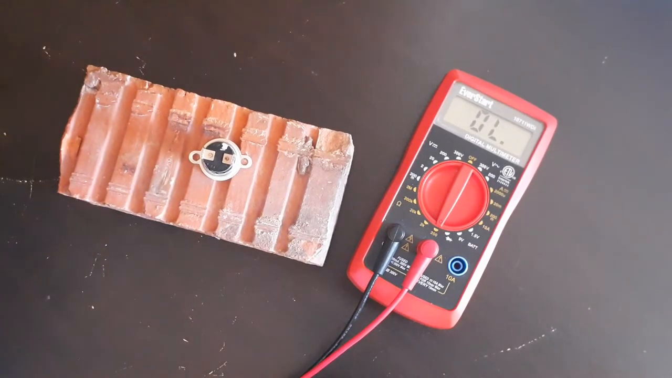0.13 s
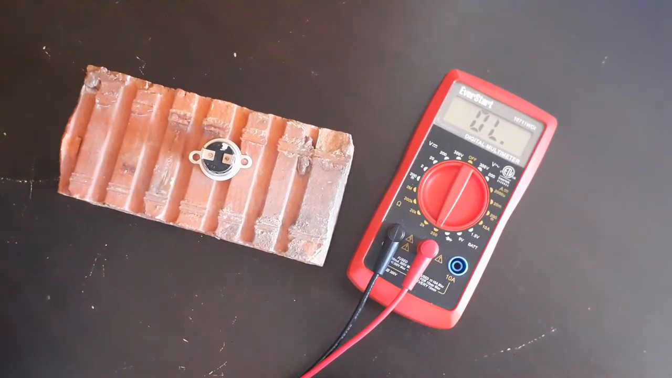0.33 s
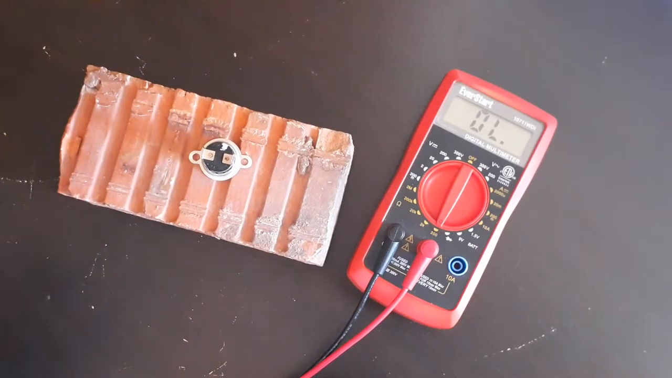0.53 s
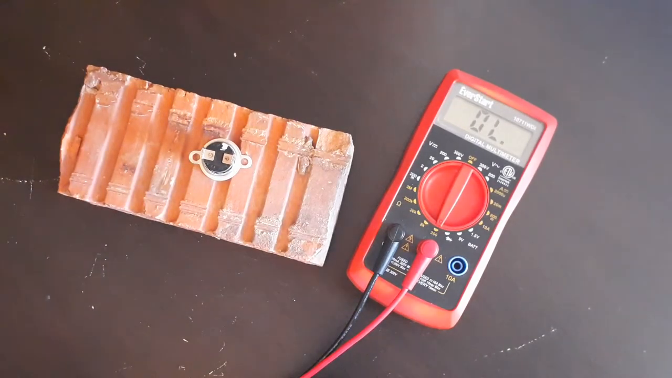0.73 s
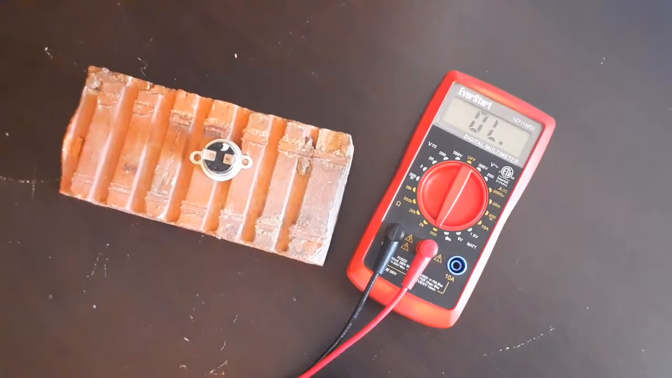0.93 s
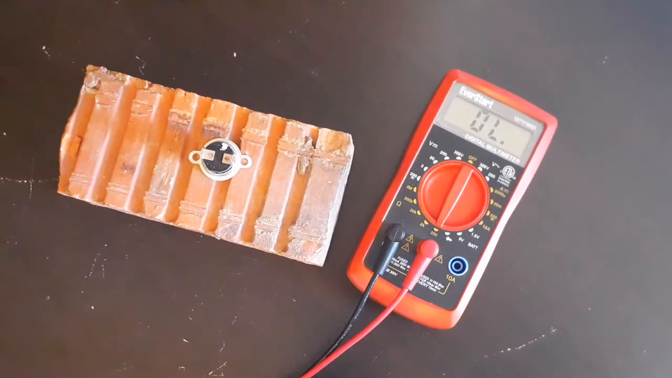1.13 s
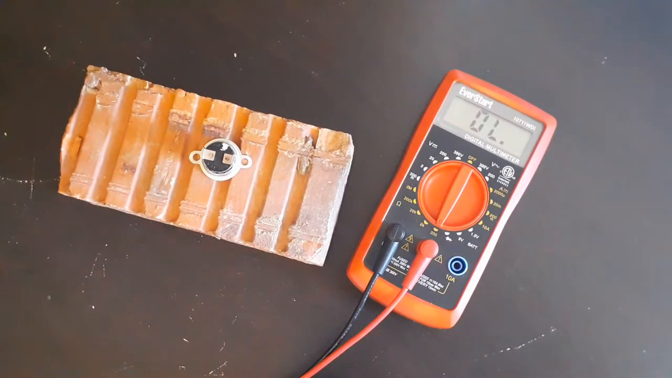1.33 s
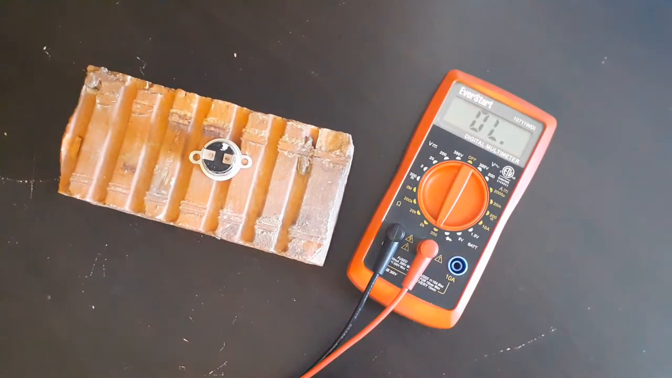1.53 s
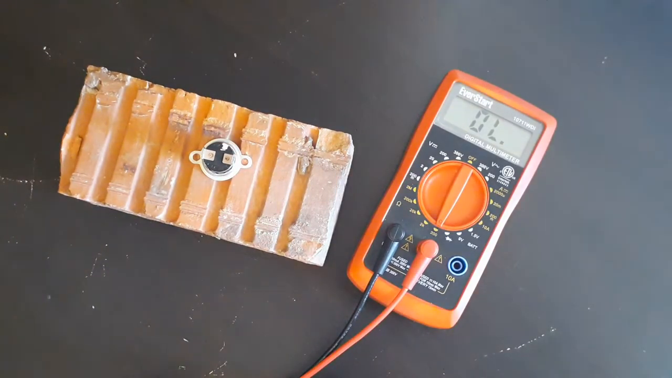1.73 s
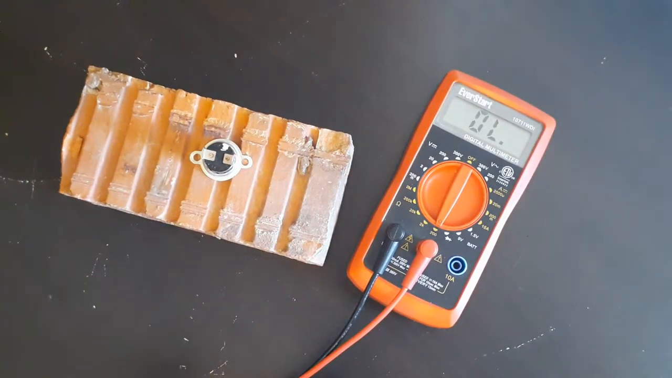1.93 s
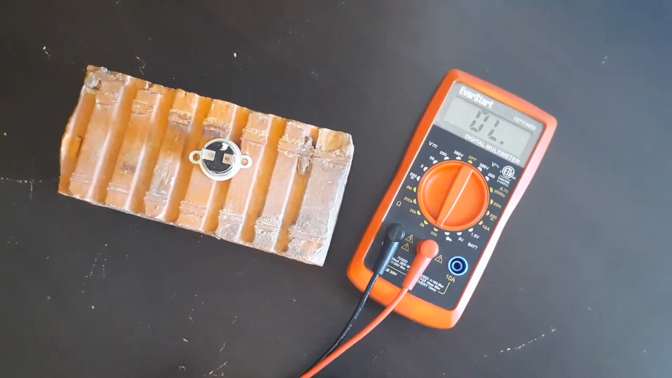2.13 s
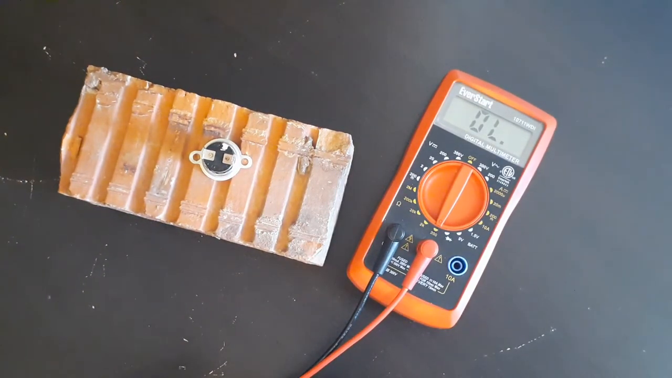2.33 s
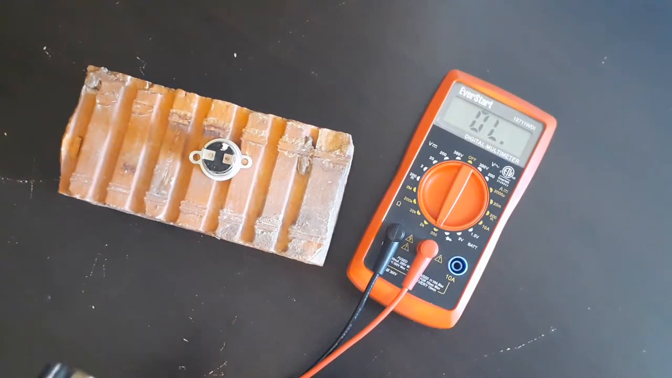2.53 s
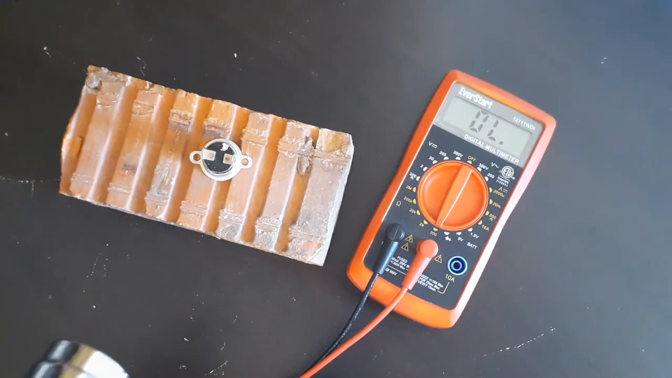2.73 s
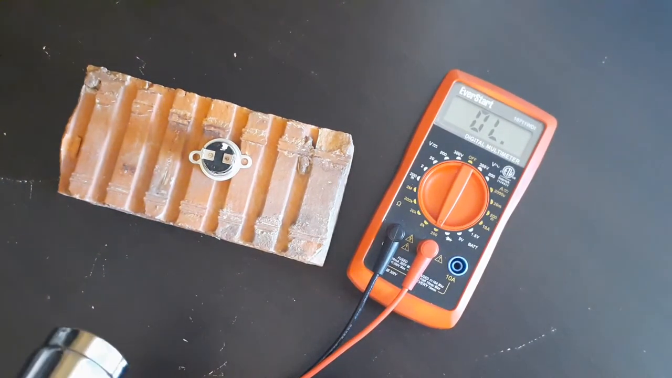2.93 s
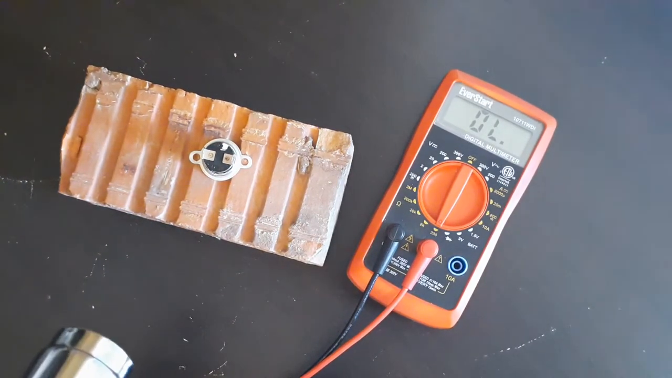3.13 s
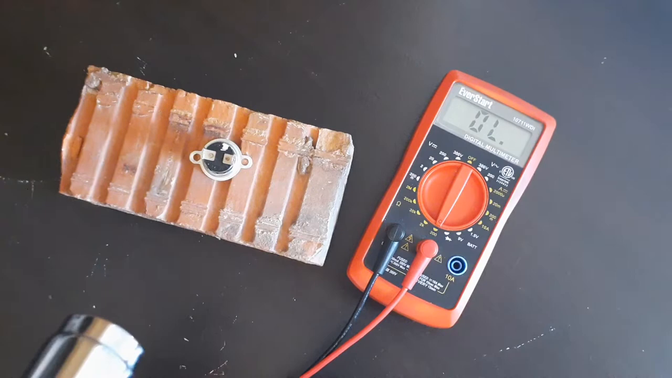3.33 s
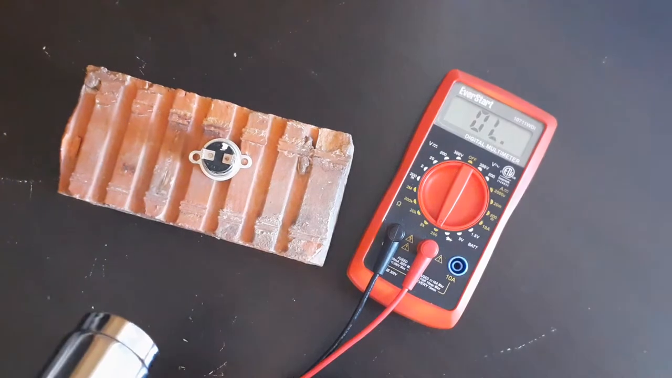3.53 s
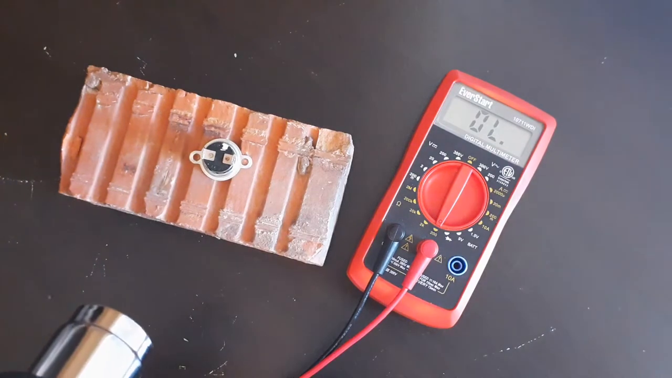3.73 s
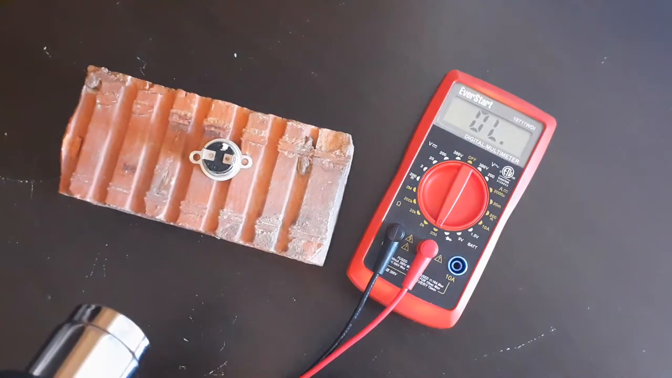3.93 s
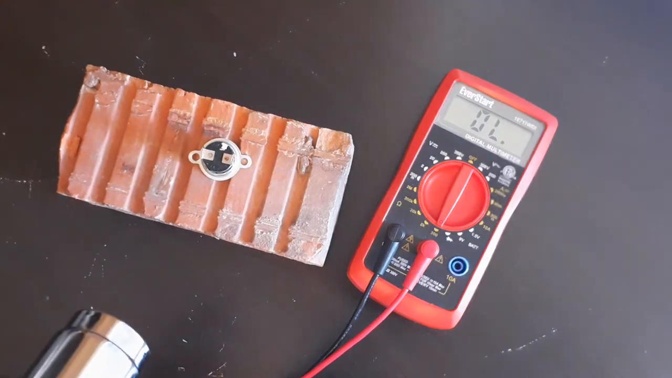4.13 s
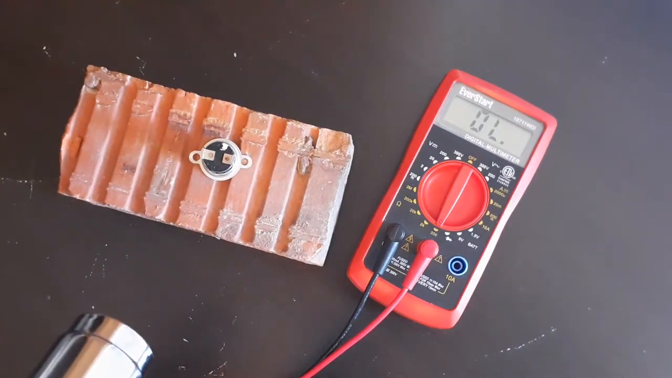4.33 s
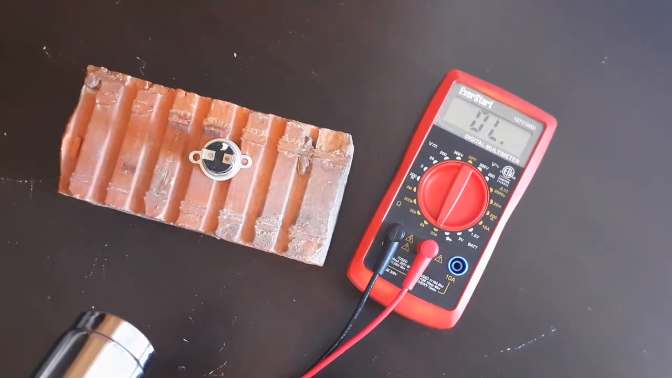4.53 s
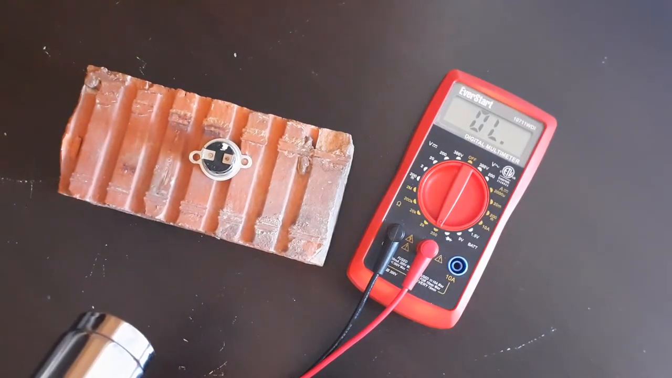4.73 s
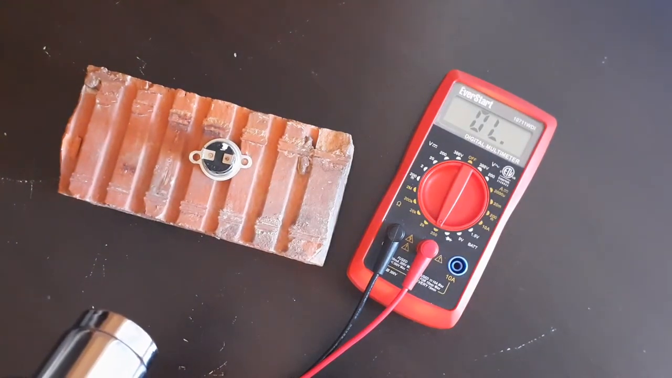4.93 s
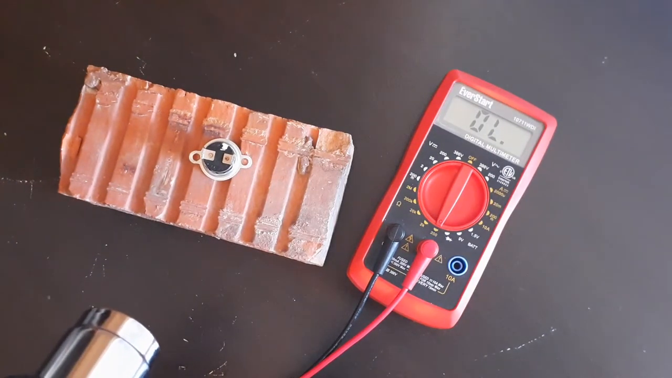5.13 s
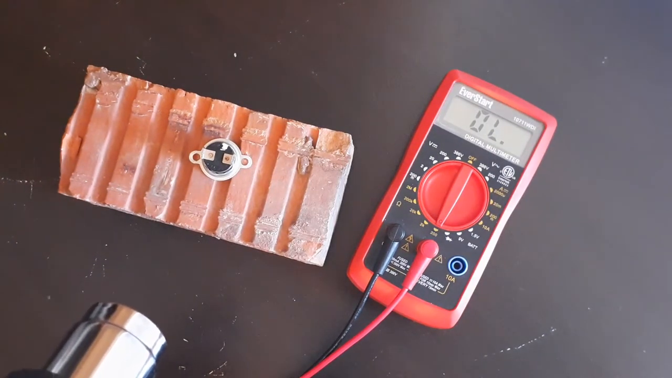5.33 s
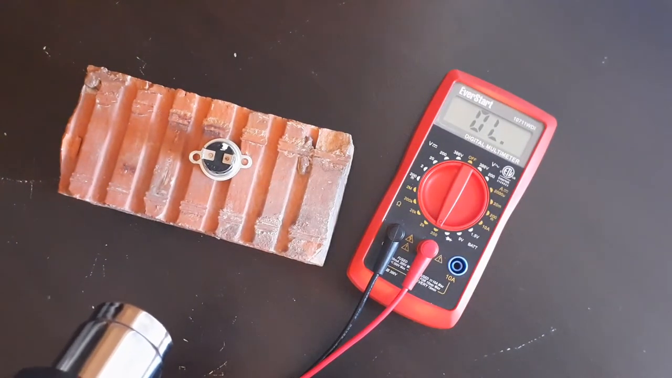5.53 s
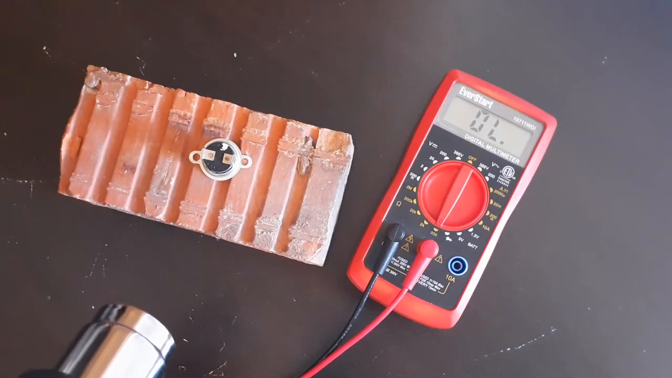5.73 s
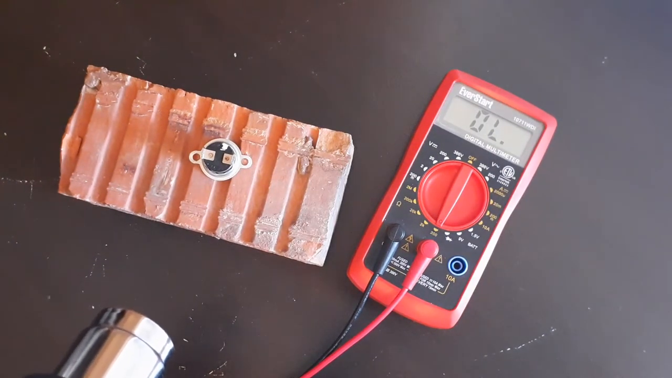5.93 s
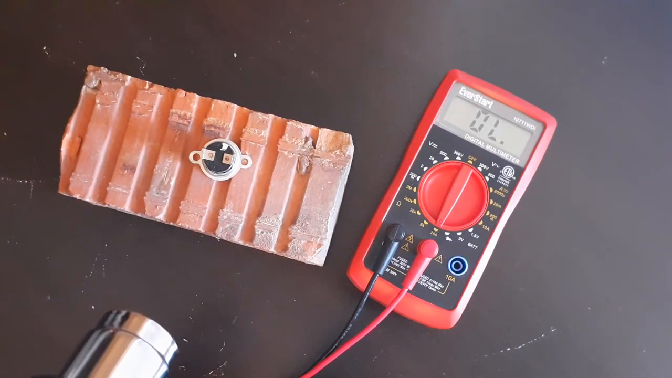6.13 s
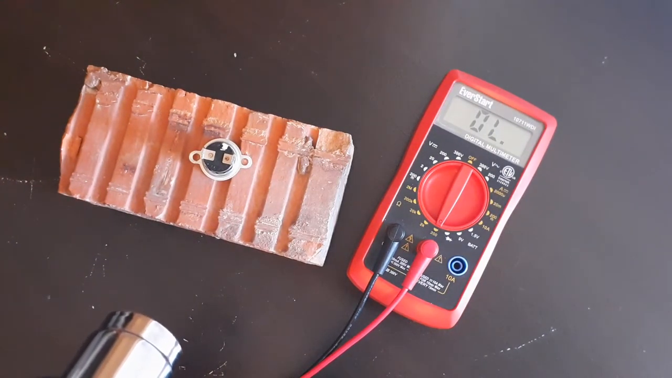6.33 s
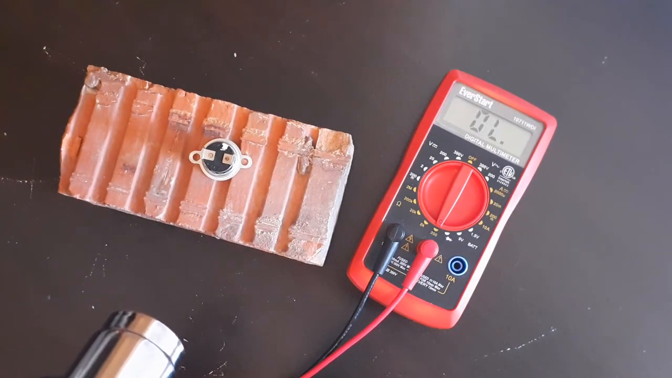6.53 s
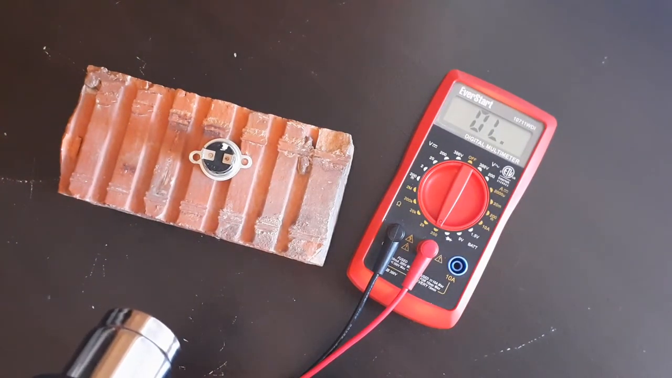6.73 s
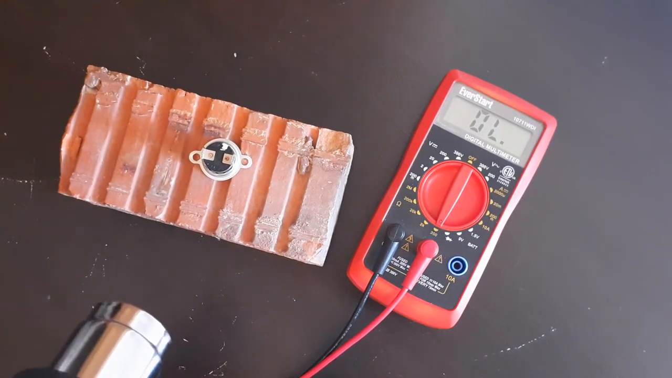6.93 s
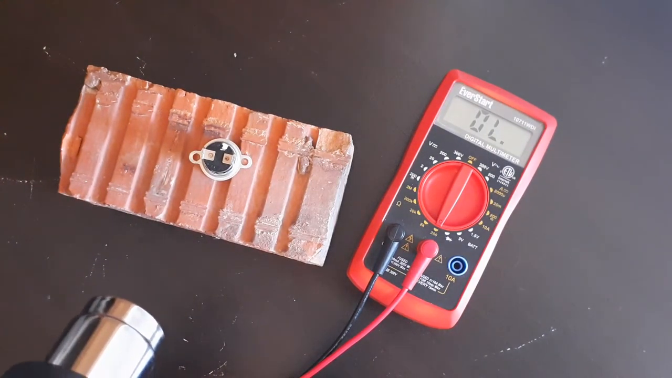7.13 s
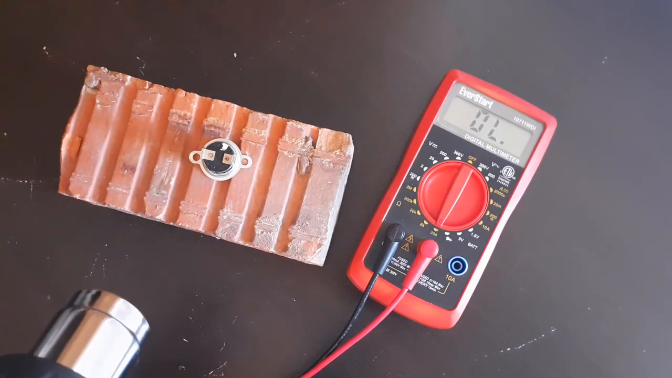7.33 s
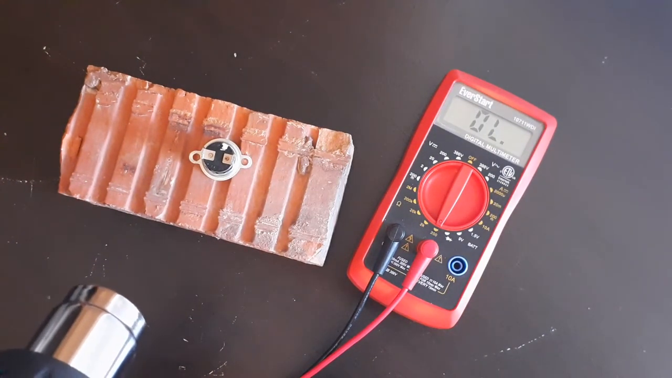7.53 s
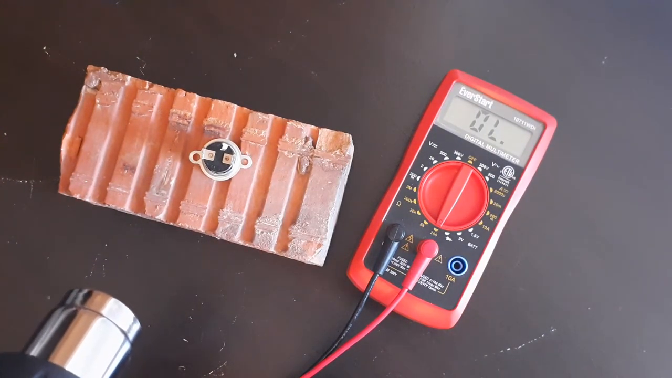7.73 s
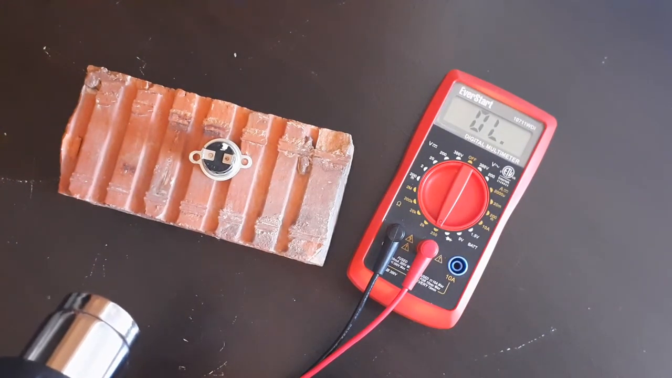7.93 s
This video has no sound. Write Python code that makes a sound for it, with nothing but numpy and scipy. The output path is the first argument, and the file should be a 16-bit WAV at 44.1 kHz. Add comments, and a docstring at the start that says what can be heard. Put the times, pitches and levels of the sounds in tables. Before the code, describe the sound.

A heat gun is dragged across a table close to the microphones in a small, quiet room, with a low scrape, a tiny squeak and a soft knock in the first half second. Its cord slides over the tabletop with a grainy rustle and a few light ticks until about 1.2 seconds. The plastic switch clicks sharply twice, at about 1.3 and 1.6 seconds, and the motor starts. A fan whine climbs in pitch while a hollow rush of air grows louder and brighter, with a few more soft scrapes and knocks on the table until about 2.4 seconds. By around 4 seconds the gun is near full speed and the pitch gradually levels off. It keeps blowing steadily to the end at about 8 seconds, the high whine gently swelling and fading over the air, a faint low hum and a thin motor buzz.

```python
"""A heat gun starts up

In a small room a heat gun is dragged off a table, its cord slides after it, and its switch clicks twice.
The motor speeds up: air rushes through the barrel, a twelve-blade fan whines, the rotor hums and the
brushes buzz. The whine swells and fades as the gun is held near the microphones in an unsteady hand."""
import sys
import numpy as np
from scipy import signal
from scipy.fft import rfft, irfft
from scipy.io import wavfile

SR = 44100
rng = np.random.default_rng(int(sys.argv[2]) if len(sys.argv) > 2 else 0)


def transcribe(signal):
    """Save signal, clipped to [-1, 1], as a 16-bit WAV file at the path in sys.argv[1]."""
    frames = np.atleast_2d(signal).T
    limited = np.clip(frames, -1, 1)
    pcm = np.round(limited * 32767).astype(np.int16)
    wavfile.write(sys.argv[1], SR, pcm)


N = 356636
TIME = np.arange(N) / SR
BINS = np.maximum(np.arange(N // 2 + 1) * SR / N, 1)  # the frequencies of a spectrum, in Hz

MOTOR_ON_S, FULL_TURNS_PER_S = 1.5456, 237.91
# The quick and the slow part of speeding up: share_of_full_speed, time_constant_s
SPEED_UP = [(.2338, .4813), (.7662, 1.0958)]
def heat_gun():
    """One motor drives air, fan and brushes. Its speed climbs from 0 (still) toward 1 (full)."""
    age = np.maximum(TIME - MOTOR_ON_S, 0)
    speed = sum(share * (1 - np.exp(-age / lag_s)) for share, lag_s in SPEED_UP)
    speed = speed * (1 + 0.000294 * drift(4.34))
    angle = 2 * np.pi * np.cumsum(speed * FULL_TURNS_PER_S) / SR
    return air_rush(speed) + fan(angle, speed) + brushes(angle, speed)


# The tone of swirling air: frequency_hz, level_db
AIR_TONE = [(40, -44), (100, -16), (280, -14), (450, -6), (900, -5), (1600, -0.1), (2200, -3), (3000, -3.5),
            (4300, -9), (6500, -15), (10000, -18.4), (14500, -21), (15800, -26)]
# Where the barrel and housing ring: pitch_hz, width_hz, left_db, right_db
BARREL_RINGS = [(574, 76, 0.5, 6), (769.5, 41, 11.5, 12), (890, 164, 5, 6), (1034, 73, -0.5, 9.5),
                (1299, 170, 10, 0.5), (1492, 108, 5, 6), (1597, 38, 7, 6), (1770, 56, 5.5, 1.5),
                (1908, 48, 9, 4.5), (2053, 24, 8, 5.5), (2424, 96, 3.5, -1.5), (2607, 89, 5.5, 3.5),
                (2960, 280, 5, 9.5), (3260, 63, 3.5, 4.5), (3790, 580, 0.5, 5.5), (4300, 650, 3, 3.5),
                (4760, 150, 3.5, 4.5), (4945, 110, 6, 6.5), (5470, 140, -1.5, 9.5), (5940, 300.0, 6, -1.5),
                (6870, 220.0, 5.5, 8.5), (8340, 410, 2.5, 8), (8500, 520, 6.0, 0), (9280, 870, 7.5, 3.5),
                (11800, 1800, 3.5, 3), (14405.0, 225.0, 6, -3)]
# How slow air sounds hollow next to fast air: frequency_hz, gain_db
HOLLOW_TONE = [(150, 4), (300, -5), (480, 6), (800, 1), (1050, 5.5), (1400, 2.5), (1900, -1.5), (2250, 5),
               (2600, 1.5), (2950, -2), (3250, -4), (3600, 3), (3950, 6), (4450, -2), (5200, 3), (6200, 2),
               (6850, 1), (7600, 2), (10000, -8), (11800, -1), (13000, 1), (14400, 3)]
def air_rush(speed, level_db=-28, treble_hz=2270, hollow_below=0.45):
    """Air swirls through the barrel: hollow when slow, louder and brighter when fast."""
    barrel_db = np.array([bumps([(hz, width, sides_db[ear]) for hz, width, *sides_db in BARREL_RINGS])
                          for ear in range(2)])
    rush = stereo_noise(at_hz(AIR_TONE) + barrel_db, ripple_db=2.86)
    hollow = shape_tone(rush, at_hz(HOLLOW_TONE))
    rush = rush + (hollow - rush) * np.clip((1 - speed) / (1 - hollow_below), 0, 1)
    treble = irfft(rfft(rush) / (1 + (treble_hz / BINS) ** 4), N)
    rush = rush - treble + treble * speed ** 0.57
    return rush * speed ** 2.74 * from_db(level_db + 0.38 * drift(10.3))


# The whine swells and fades as its echoes add up or cancel: time_s, left_db, right_db, left_lead_rad
WHINE_SWELLS = [(1.9, -11, -9, 2.6), (2.03, -6, -8, 1.5), (2.2, -22, -14, 1.5), (2.31, -11, -4.5, 1.7),
                (2.38, -17, -20, 4.6), (2.5, -14, -2.5, 3.5), (2.58, -8, -5, 3.9), (2.66, -9, -6, 1.7),
                (2.78, -2.5, -7, 0.7), (2.87, -10, -15, .9), (2.96, -5, -6, 2.1), (3.08, -8, -11, 2.4),
                (3.18, -2, -12, 4.3), (3.26, 0, -1, 2.8), (3.33, -3.5, -10, 2.3), (3.39, -1.5, 0, 2.4),
                (3.45, -5, -3, 3.9), (3.54, -1, 2.5, 3.37), (3.64, 0.5, -7, 3.9), (3.7, 2, 0, 2.3),
                (3.78, -1, 3.5, 3.8), (3.87, 2, -2, 4.56), (3.97, 5.5, -10, 2.6), (4.1, 1, 3, 2.1),
                (4.18, -3, 2.5, 2.54), (4.36, 2.5, 3, 3.34), (4.72, -2.5, 1.5, 2.9), (4.8, -8, 2, 2.1),
                (4.94, -0.5, 5, 4), (5.2, -2.5, -1.5, 3.93), (5.46, 2.5, 3.5, 3.83), (5.6, -1, 1, 3.4),
                (5.7, -0.5, 4, 3.35), (5.82, -4, 4.5, 3.96), (6.88, -3, 0.5, 4.1), (6.96, -11, -2, 5.5),
                (7.24, -1.5, 0.5, 4.5), (8.08, -1.5, -1, 4.5)]
# Where the gun's body boosts the hum: pitch_hz, width_hz, gain_db
BODY_RINGS = [(178, 16, 9), (229.7, 14.4, 8.5)]
# Faint low tones of the fan: cycles_per_turn, level_db
UNEVEN_TONES = [(2, -54), (3, -63), (5, -52), (6, -56), (7, -57)]
def fan(angle, speed, blades=12, whine_db=-28.5, hum_db=-52):
    """Passing blades whine, the off-balance rotor hums, and uneven blades add low tones."""
    left_db, right_db, lead = in_time(WHINE_SWELLS)
    flutter = np.array([drift(23) + 1j * drift(40) for ear in range(2)])
    depth = 0.06 + 0.8 * np.clip(1 - speed, 0, 0.3)  # a rising tone wavers against its own echoes
    fade_in = 1 / (1 + np.exp((0.38 - speed) / 0.064))  # halfway in at 38% of full speed
    blade_tone = np.exp(1j * (blades * angle + lead * [[.5], [-.5]])) * (1 + depth * flutter)
    whine = from_db(whine_db + np.array([left_db, right_db])) * speed ** 1.1 * blade_tone.real
    body_db = bumps(BODY_RINGS, speed * FULL_TURNS_PER_S)
    hum = from_db(hum_db + body_db + [[-.7], [.7]]) * np.sin(angle + [[.25], [-.25]])
    uneven = sum(from_db(db + 3.1 * drift(7.7)) * np.sin(k * angle + rng.uniform(0, np.pi, (2, 1)))
                 for k, db in UNEVEN_TONES)
    return np.sqrt(2) * (fade_in * whine + speed ** 4.7 * (hum + fade_in * uneven))


# Overtones of the buzz that stand out: cycles_per_turn, boost_db
STRONG_OVERTONES = [(20, 4), (23, 3), (26, 7), (27, 6), (29, 3), (31, 8), (36, 7), (38, 7), (40, 3),
                    (41, 3), (42, 4), (46, 6), (47, 2), (52, 4), (56, 5), (65, 5), (72, 3)]
# The brushes chatter most while the motor pulls hard: share_of_full_speed, gain_db
BRUSH_CHATTER = [(0, -60), (.3, -22), (.55, -14), (.65, -7), (.71, -1.5), (.8, -.5), (.92, 0), (.96, -2.5),
                 (1, -4.5)]
# How the housing shapes the buzz: frequency_hz, gain_db
BUZZ_TONE = [(2500, -85), (3400, -70), (4000, -60), (4450, -69), (5000, -63), (5200, -62), (5300, -58),
             (5400, -61), (5510, -58.5), (5620, -68), (6400, -75), (7500, -74), (8000, -68), (8330, -60),
             (8900, -64.5), (9750, -62), (10500, -72), (11700, -72), (12600, -68), (13400, -72),
             (13900, -65), (14450, -63), (14900, -71), (16000, -82)]
# The hiss of the rubbing brushes: frequency_hz, level_db
BRUSH_HISS_TONE = [(600, -34), (2000, -4), (3200, -30), (3950, 19), (4600, -16), (5450, 23), (6400, -15),
                   (8300, 5), (9700, 9), (11500, -10), (14400, -9), (16000, -17)]
def brushes(angle, speed, hiss_db=-58):
    """The brushes rub over the same rough contacts on every turn, so they buzz and hiss."""
    overtones = np.arange(14, 91)
    fade_db = np.interp(overtones, [55, 73, 90], [0, -1.5, -16])
    random_db = rng.normal(-1.5, 2.5, len(overtones))
    levels_db = [dict(STRONG_OVERTONES).get(k, db) for k, db in zip(overtones, random_db)]
    strengths = np.sqrt(2) * from_db(fade_db + levels_db)
    circle = np.linspace(0, 2 * np.pi, 2048)
    one_turn = np.sin(np.outer(circle, overtones) + rng.uniform(0, 2 * np.pi, len(overtones))) @ strengths
    chatter_db = np.interp(speed, *np.transpose(BRUSH_CHATTER)) + drift(40)
    contact = np.interp(angle % (2 * np.pi), circle, one_turn) * from_db(chatter_db)
    buzz = shape_tone(contact, at_hz(BUZZ_TONE) - 2)
    buzz = room(buzz, tail_db=-6, early_db=-6, early_fade_s=0.03, right_lag_samples=0)
    return buzz + from_db(hiss_db) * speed ** 0.28 * stereo_noise(at_hz(BRUSH_HISS_TONE))


# Clicks of the cord and the switch: start_s, level_db, ring_hz, ring_width_hz, ring_db
CLICK_HITS = [(.558, -38, 10000, 2100, 12), (.779, -21, 10000, 2100, 3), (0.988, -28, 9500, 2100, 13),
              (1.096, -34, 8600, 2100, 7), (1.153, -29, 8450, 2100, 7), (1.3395, -12.5, 8700, 1300, 8),
              (1.341, -6.5, 4000, 400, 9.5), (1.5533, -19, 11800, 2100, 7), (1.5555, -1, 3200, 900, 3),
              (1.559, -6.5, 5560, 2100, 11)]
# Where the plastic shell rings: pitch_hz, width_hz, gain_db
SHELL_RINGS = [(610, 170, -1.5), (1060, 490, -1), (1940, 300, 10), (2380, 440, 7), (3200, 700, 5.5),
               (4100, 350, 4.5), (4800, 920, 1.5), (6450, 490, -1), (8800, 1400, 1.5), (11700, 1400, 0),
               (14300, 3000, -1.5)]
def clicks(crack_s=0.0003):
    """Each click is a tiny crack that rings the spot it hits and the shell, with echoes of its own."""
    out, age = np.zeros((2, N)), TIME[:SR // 2]
    for start_s, db, ring_hz, ring_width_hz, ring_db in CLICK_HITS:
        crack = flatten(rng.standard_normal(len(age)) * np.exp(-np.minimum(age / crack_s, 50)))
        force = from_db(db - 5) * (crack + from_db(ring_db) * resonate(crack, ring_hz, ring_width_hz))
        shell = sum((-1) ** k * from_db(gain_db) * resonate(force, hz, width)
                    for k, (hz, width, gain_db) in enumerate(SHELL_RINGS))
        start = round(start_s * SR)
        out[:, start:start + len(age)] += room(shell, tail_db=1, early_db=1, early_fade_s=0.03)
    return out


# Pulls of the gun over the table: peak_s, hold_s, rumble_db, scrape_db
PULLS = [(.1, 0.048, -39.5, -40.5), (.18, 0.037, -40, -33), (.28, 0.15, -45, -45.5),
         (.945, 0.077, -54.5, -53.5), (1.64, 0.05, -51, -51.5), (1.755, 0.07, -43.5, -43.5),
         (1.84, 0.029, -52, -45), (1.94, 0.041, -46, -40.5), (2.045, 0.022, -45, -55),
         (2.17, 0.059, -58, -71)]
# The table's low rumble: frequency_hz, level_db
RUMBLE_TONE = [(24, -50), (40, -21), (81, -8), (140, 4), (183, -3), (231, -7.5), (272, -6), (340, -16),
               (400, -12), (520, -52), (880, -120)]
# The scrape above it: frequency_hz, level_db
SCRAPE_TONE = [(180, -54), (300, -7), (423, -3), (828, -8.5), (991, -15), (1420, -10.5), (1900, -9.5),
               (2350, -19.5), (3900, -25.5), (5350, -29.5), (6950, -34), (7920, -31), (15000, -40)]
def dragging():
    """The gun sticks and slips, so the table top rumbles and scrapes."""
    rumble = stereo_noise(at_hz(RUMBLE_TONE)) * from_db(-2.5 + 1.05 * drift(40))
    scrape = stereo_noise(at_hz(SCRAPE_TONE)) * from_db(-4.5 + 0.31 * drift(96))
    rumbling, scraping = strokes(PULLS, rise_db_per_s=187, fall_db_per_s=105)
    return rumbling * rumble + scraping * scrape


# When the housing squeaks: peak_s, hold_s, level_db
SQUEAK_STROKES = [(.084, 0.09, -51), (.141, 0.01, -49)]
# The pitches in the squeak: pitch_hz, width_hz, gain_db
SQUEAK_RINGS = [(5670, 42, 12), (7800, 160, 2), (8500, 580, -6), (10300, 300, -27)]
def squeak():
    """Tiny, jerky slips of the housing on the table ring a few high pitches."""
    slips = rng.standard_normal((2, N)) * from_db(4.2 * drift(200))
    ringing = rms_one(sum(from_db(db) * resonate(slips, hz, width) for hz, width, db in SQUEAK_RINGS))
    return ringing * strokes(SQUEAK_STROKES, rise_db_per_s=2498, fall_db_per_s=332)


# Sudden slips of the cord: peak_s, hold_s, hiss_db, rub_db, rasp_db
CORD_SLIPS = [(.139, .008, -48, -70, -57), (.3, 0.23, -65.5, -60, -66), (.558, .006, -61, -57, -48.5),
              (.58, 0.016, -55, -53.5, -50), (.604, 0.032, -53, -56, -48), (.65, 0.048, -53, -52.5, -44.5),
              (.698, 0.032, -47.5, -45.5, -61), (.78, 0.042, -54, -57, -50), (.83, 0.087, -50, -56, -68),
              (.99, 0.015, -52.5, -62, -54.5), (1.05, 0.15, -65, -66.5, -80)]
# The cord's high hiss: frequency_hz, level_db
CORD_HISS_TONE = [(1470, -34), (2500, -1.5), (3300, -9), (3900, -8), (5410, -7.5), (6920, -11), (7600, -11),
                  (10200, -8), (14000, -11), (15800, -15)]
# The cord's lower rub: frequency_hz, level_db
CORD_RUB_TONE = [(120, -9), (200, -7), (294, -12), (520, -1), (673, -9), (900, -4.5), (1250, -12),
                 (1650, -10.5), (2050, -6), (2600, -15), (3380, -41), (5720, -120)]
# The pitches in its rasp: pitch_hz, width_hz, gain_db
RASP_RINGS = [(2060, 110, -5), (4030, 130, -2), (4700, 200, -3), (5380, 110, 6), (7400, 200, 1),
              (7950, 150, -1), (8850, 350, 3), (9800, 150, 8), (10200, 400, 5), (11200, 400, -1),
              (12100, 700, 3), (13650, 350, 2.5)]
def cord():
    """The cord rubs over the table with a fine, grainy sound."""
    hissing, rubbing, rasping = strokes(CORD_SLIPS, rise_db_per_s=3996, fall_db_per_s=214)
    grain = from_db(0.45 * drift(150))
    hiss = hissing * stereo_noise(at_hz(CORD_HISS_TONE))
    rub = rubbing * stereo_noise(at_hz(CORD_RUB_TONE))
    rasp = sum(from_db(db) * resonate(rng.standard_normal((2, N)), hz, width)
               for hz, width, db in RASP_RINGS)
    return grain * (hiss + rub + rasping * rms_one(rasp))


# Soft knocks on the table: start_s, level_db, pitch_hz, fade_s (time to fall by 60 dB)
TABLE_KNOCKS = [(0.18, -24.5, 158.5, 0.13), (0.426, -39, 135, 0.15), (1.754, -36, 200, .15),
                (1.84, -50, 60, .3), (2.33, -35, 109, 0.13), (2.37, -46, 59.6, 0.4)]
def knocks(rise_s=0.0098):
    """Each knock rings one low note of the table that dies quickly."""
    out = np.zeros(N)
    for start_s, db, hz, fade_s in TABLE_KNOCKS:
        age = np.clip(TIME - start_s, 0, 1)
        out += from_db(db - 60 * age / fade_s) * np.sin(2 * np.pi * hz * age) * np.minimum(age / rise_s, 1)
    return room(out, tail_db=-20, early_db=-18)


# The tone of a finger's tap: frequency_hz, level_db
TAP_TONE = [(250, -17), (480, -12), (620, 5), (800, -6), (1000, -4), (1200, -7), (1600, -24), (2200, -12),
            (4000, -31), (9000, -26), (15000, -40)]
def finger_tap(start_s=1.247, level_db=-51.5, rise_s=0.0055, fade_s=0.53):
    """A finger lands on the handle with a dull thud."""
    age = np.clip(TIME - start_s, 0, 1)
    loudness = from_db(level_db - 60 * age / fade_s) * np.minimum(age / rise_s, 1)
    return loudness * stereo_noise(at_hz(TAP_TONE))


# How long the room's echo takes to fall by 60 dB: frequency_hz, fade_s
ROOM_FADE = [(150, 0.72), (600, 0.41), (2000, 0.48), (5000, 0.33), (9000, 0.48), (15000, 0.26)]
def room(dry, tail_db, early_db, early_fade_s=0.067, right_lag_samples=8):
    """Sound arrives directly, then scattered off the table, then as the room's fading echo."""
    age, edges_hz = TIME[:SR // 2], np.geomspace(100, 17000, 9)
    tail = 0
    for low, high in zip(edges_hz, edges_hz[1:]):
        band_pass = signal.butter(2, [low, high], "band", fs=SR, output="sos")
        band = signal.sosfilt(band_pass, rng.standard_normal((2, len(age))))
        tail = tail + band * from_db(-60 * age / at_hz(ROOM_FADE, np.sqrt(low * high)))
    tail = tail * np.minimum(age / 0.00084, 1)
    scatter = rng.standard_normal((2, len(age))) + rng.standard_normal(len(age))  # partly shared
    early = flatten(scatter * from_db(-60 * age / early_fade_s))
    echoes = (from_db(tail_db) * rms_one(tail) + from_db(early_db) * rms_one(early)) / np.sqrt(len(age))
    left, right = dry + signal.fftconvolve(dry[None], echoes, axes=1)[:, :len(dry)]
    return np.array([left, np.pad(right, (right_lag_samples, 0))[:len(dry)]])


# The quiet room: frequency_hz, level_db
BACKGROUND_TONE = [(30, -2), (60, 16.5), (140, 5), (300, -22), (700, -2), (1300, -8), (2000, -4),
                   (3500, -19), (8000, -26), (15000, -22)]
def background(level_db=-71):
    """A faint, steady, mostly low noise fills the room."""
    return from_db(level_db) * stereo_noise(at_hz(BACKGROUND_TONE))


# How the two microphones hear one sound: frequency_hz, likeness (0 to 1), left_lead_rad
MICROPHONES = [(60, 0.9, .1), (250, 0.74, 0.38), (510, 1, 0.77), (850, 0.66, 1.45), (1080, 0.26, 2.07),
               (1820, 0.49, 2.77), (1835, 0.83, 1.5), (2570, 0.45, 2.4), (3130, 0.48, 3.3), (4160, 0, 6.56),
               (7340, 0, 7.3), (8600, 0.55, 7.6), (12000, 0, 12.8), (14900, 0, 11)]
def stereo_noise(tone_db, ripple_db=4.5):
    """Noise that is partly alike left and right; echoes leave small peaks and dips in its tone."""
    hz, alike, lead = np.transpose(MICROPHONES)
    alike = np.clip(at_hz(np.c_[hz, alike]), 0, 1)
    mid, side = rfft(rng.standard_normal((2, N)))
    ears = np.sqrt(1 + alike) * mid + np.sqrt(1 - alike) * side * [[1], [-1]]
    ears = ears * np.exp(1j * at_hz(np.c_[hz, lead]) * [[.5], [-.5]])
    steps_hz = np.arange(0, SR / 2, 45)
    ripple = np.array([np.interp(BINS, steps_hz, rng.standard_normal(len(steps_hz))) for ear in range(2)])
    depth_db = 2 * ripple_db * BINS / (BINS + 1500) / (1 + (BINS / 15000) ** 2)
    return rms_one(shape_tone(irfft(ears, N), tone_db + depth_db * ripple))


def strokes(rows, rise_db_per_s, fall_db_per_s):
    """Each stroke swells, holds and dies away; gives one loudness curve per level column."""
    power = 0
    for peak_s, hold_s, *levels_db in rows:
        rise_db = rise_db_per_s * np.maximum(peak_s - TIME, 0)
        fall_db = fall_db_per_s * np.maximum(TIME - peak_s - hold_s, 0)
        shape = from_db(np.maximum(-rise_db - fall_db, -120))
        power = power + np.outer(from_db(levels_db), shape) ** 2
    return np.sqrt(power)


def drift(rate_hz):
    """A smooth random wobble, about 1 in size."""
    step = 16
    r = np.exp(-2 * np.pi * rate_hz * step / SR)
    slow = signal.lfilter([1], [1, -2 * r, r * r], rng.standard_normal(2 * N // step))[N // step:]
    return np.interp(np.arange(N) / step, np.arange(len(slow)), rms_one(slow))


def resonate(x, hz, width_hz):
    """Ring at one pitch; a narrower width rings longer."""
    r = np.exp(-np.pi * width_hz / SR)
    feedback = [1, -2 * r * np.cos(2 * np.pi * hz / SR), r * r]
    return signal.lfilter(np.array([1, 0, -1]) * (1 - r * r) / 2, feedback, x + 1e-18)


def bumps(rings, at=BINS):
    """The gain in dB that ringing adds at each frequency."""
    return sum(db / (1 + (2 * (at - hz) / width) ** 2) for hz, width, db in rings)


def flatten(burst):
    """Make a short burst about equally strong at every frequency."""
    size = burst.shape[-1]
    return irfft(np.exp(1j * np.angle(rfft(burst, 2 * size))))[..., :size]


def shape_tone(x, gain_db):
    """Turn each frequency up or down."""
    return irfft(rfft(x) * from_db(gain_db), N)


def at_hz(points, hz=BINS):
    """Read a table between its rows, with octaves evenly spaced."""
    table_hz, value = np.transpose(points)
    return np.interp(np.log(hz), np.log(table_hz), value)


def in_time(rows):
    """Read each column of a timed table at every sample."""
    times_s, *columns = np.transpose(rows)
    return [np.interp(TIME, times_s, column) for column in columns]


def from_db(db):
    return 10 ** (np.asarray(db) / 20)


def rms_one(x):
    return x / np.sqrt(np.mean(x ** 2) + 1e-20)


def scene():
    """Handling noises a little to the right, then the running gun, over the quiet room."""
    gun = heat_gun()
    handling = dragging() + squeak() + clicks() + knocks() + finger_tap()
    return gun + handling * from_db([[-.9], [.9]]) + cord() + background()


def record(dry):
    """Cut off the highest treble steeply, above 15750 Hz."""
    return signal.sosfilt(signal.ellip(10, .1, 80, 15750, fs=SR, output="sos"), dry)


dry = scene()
out = record(dry)
transcribe(out)
```